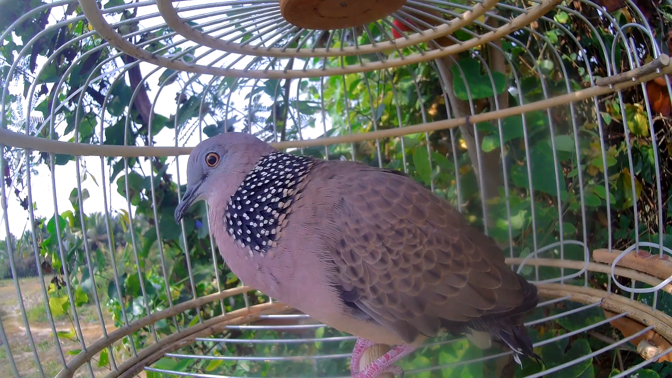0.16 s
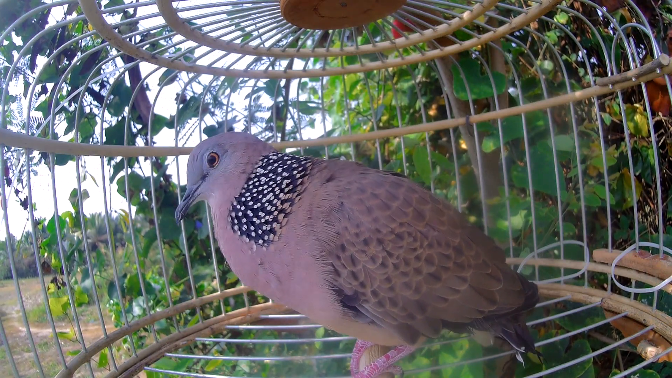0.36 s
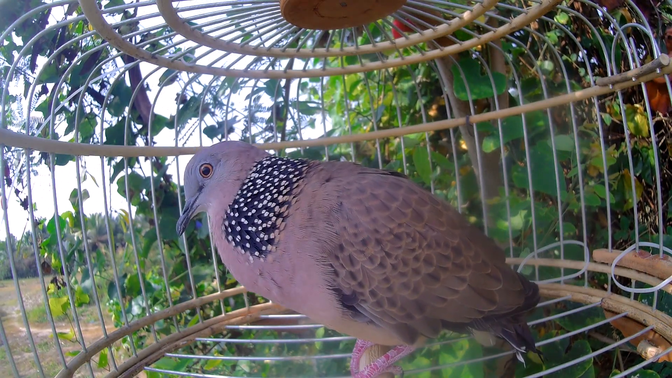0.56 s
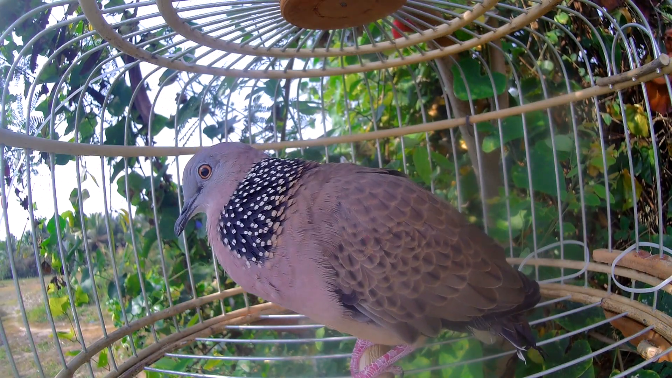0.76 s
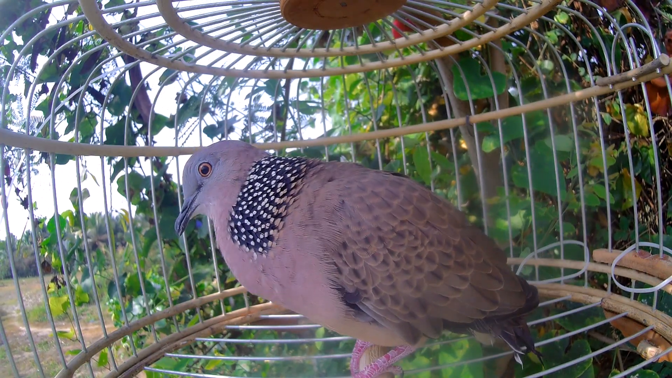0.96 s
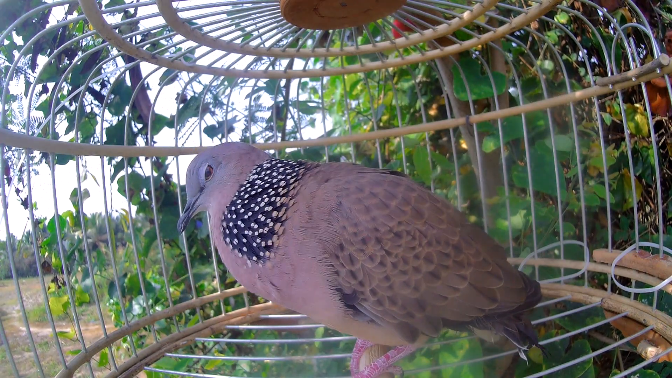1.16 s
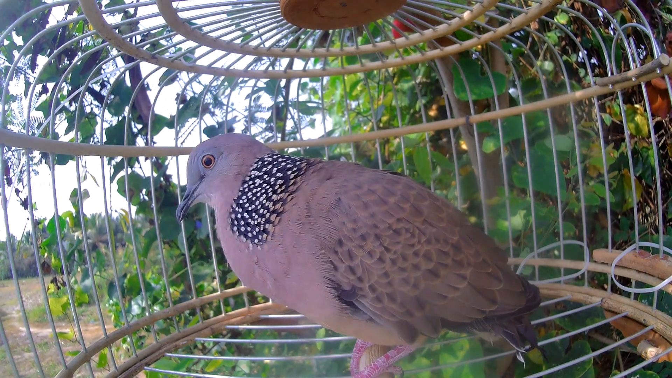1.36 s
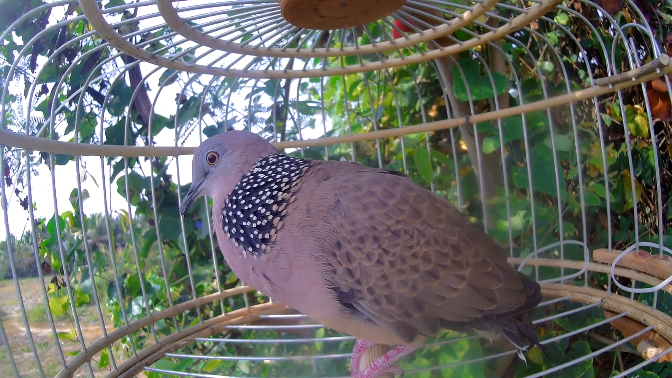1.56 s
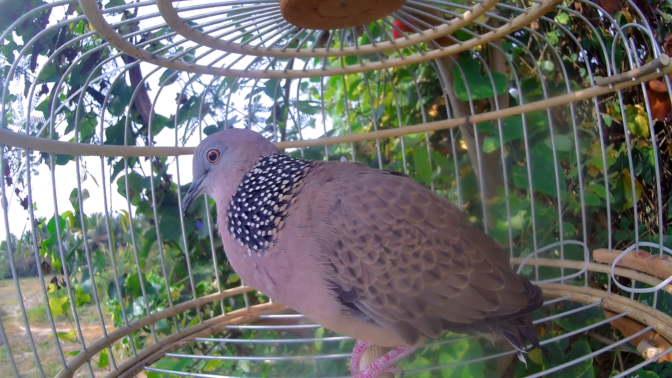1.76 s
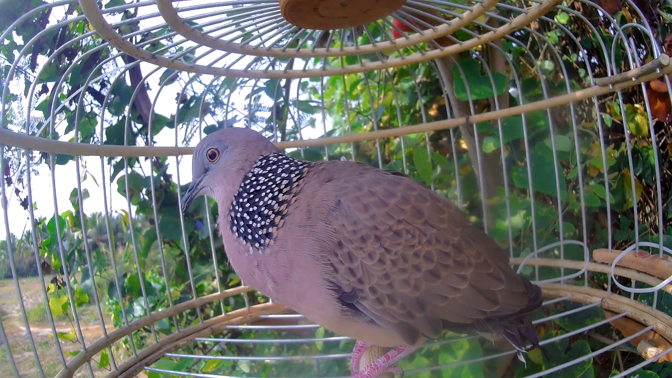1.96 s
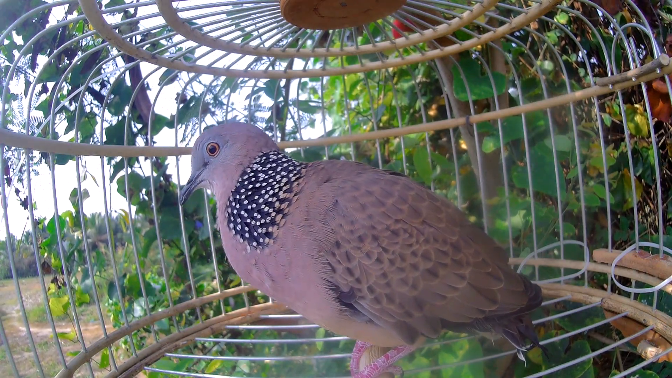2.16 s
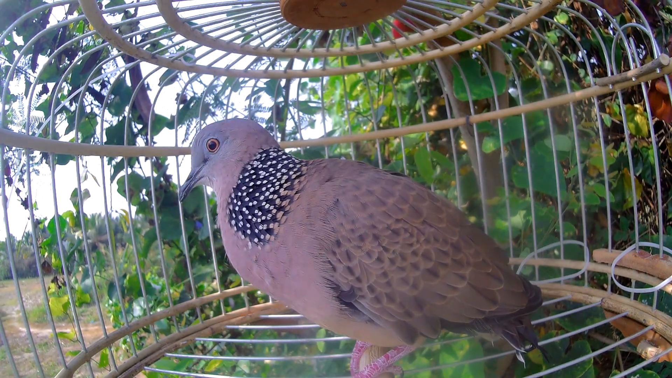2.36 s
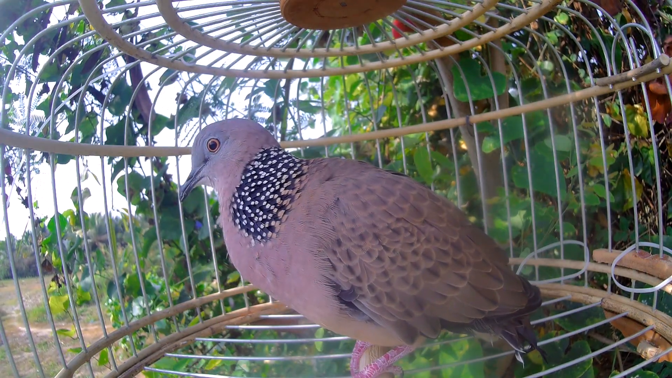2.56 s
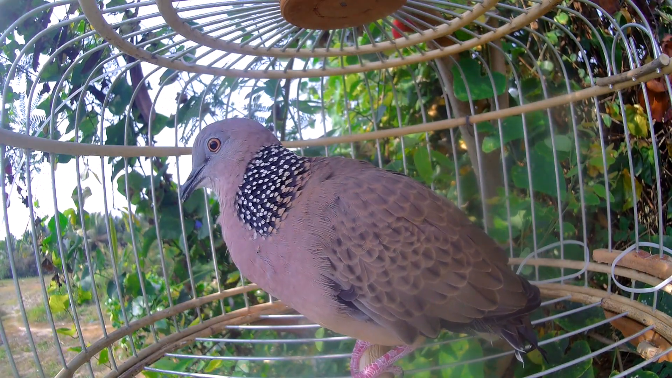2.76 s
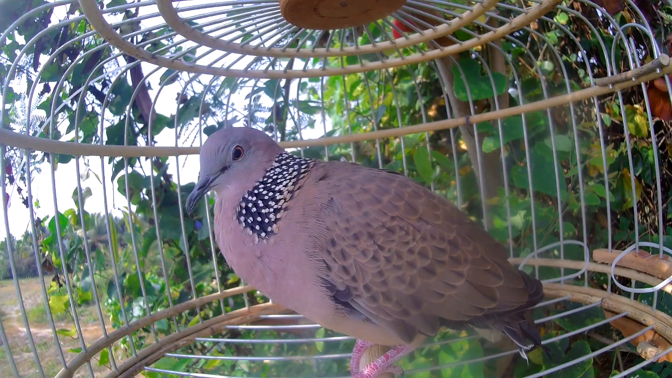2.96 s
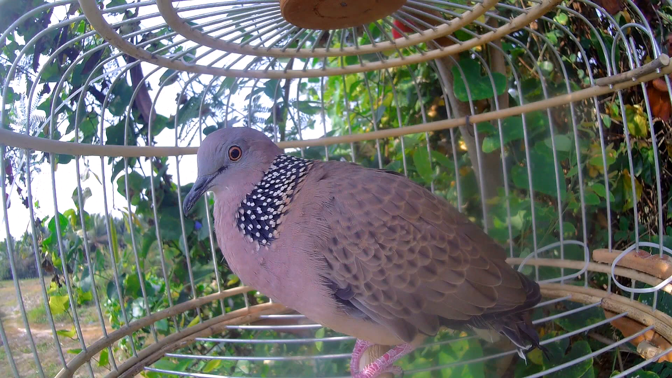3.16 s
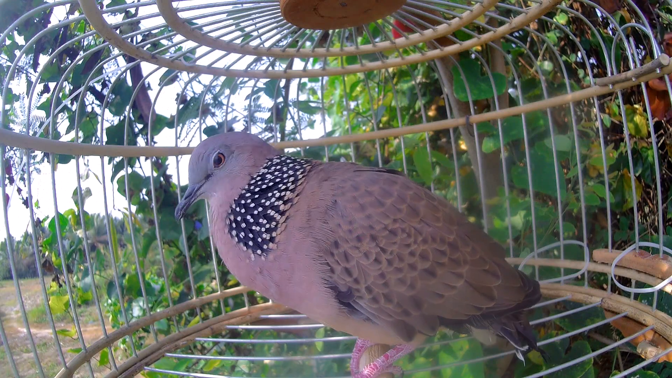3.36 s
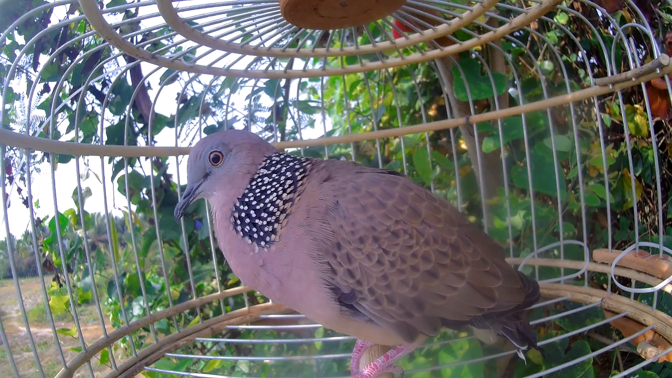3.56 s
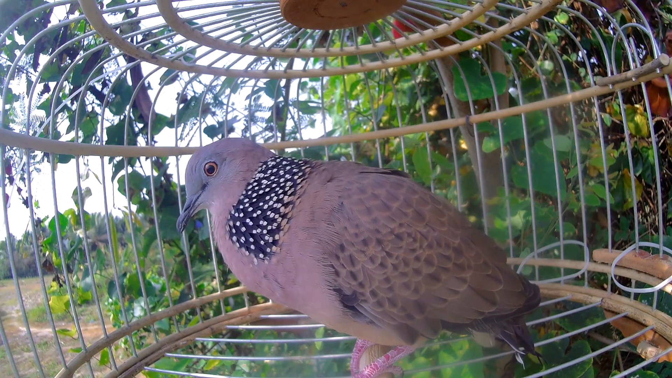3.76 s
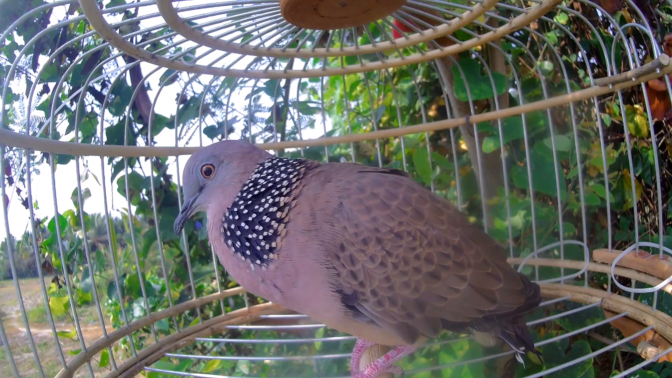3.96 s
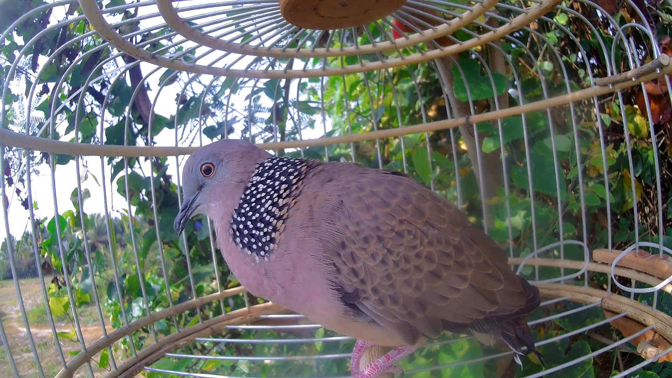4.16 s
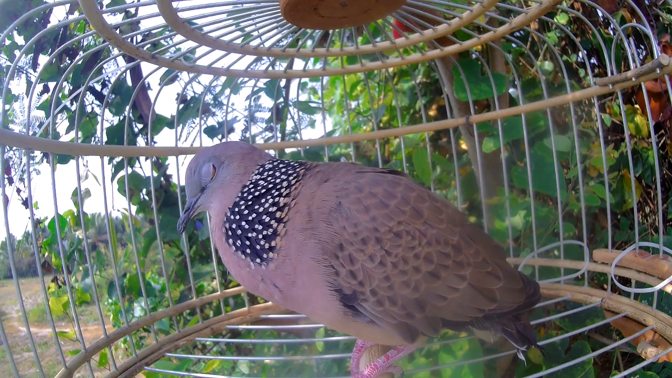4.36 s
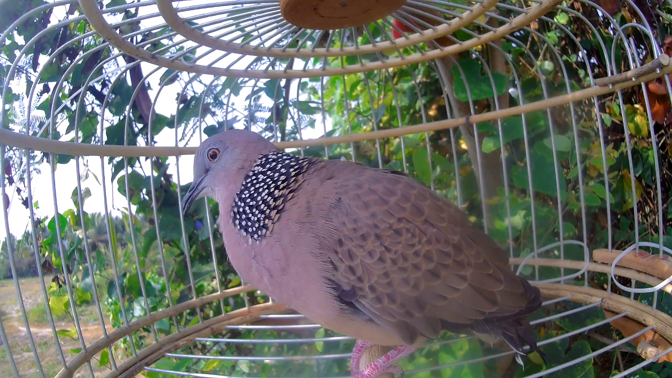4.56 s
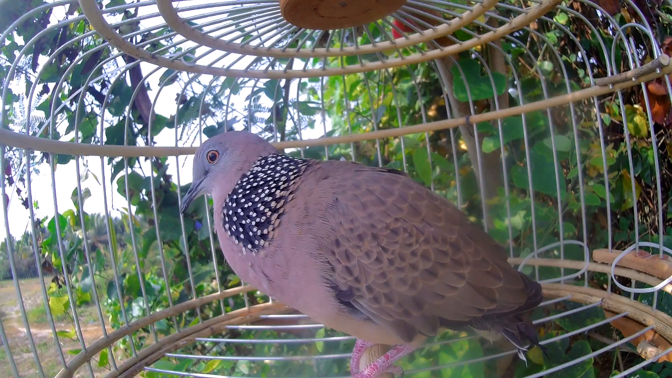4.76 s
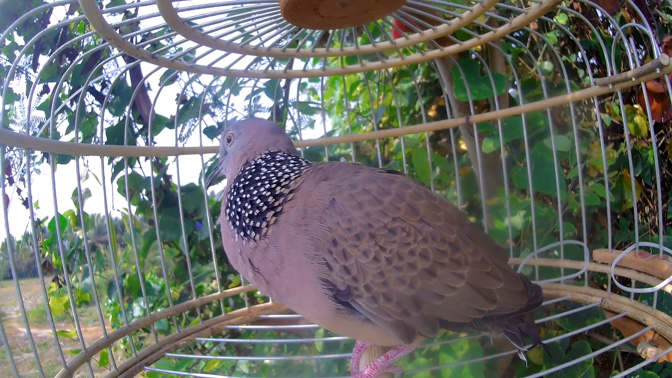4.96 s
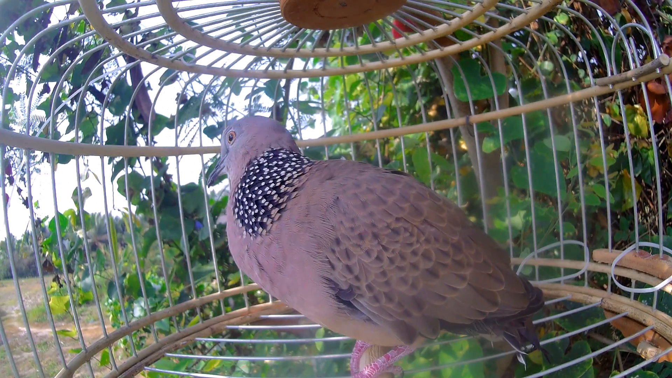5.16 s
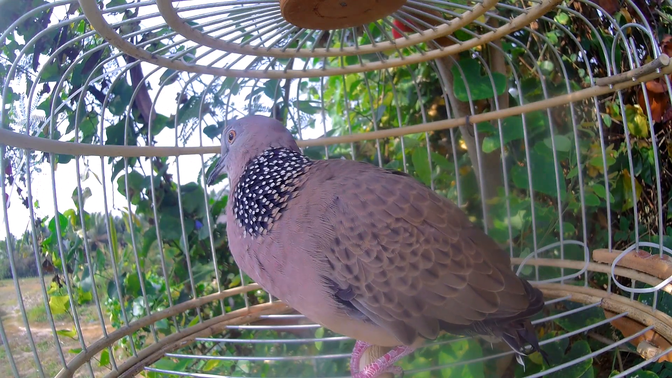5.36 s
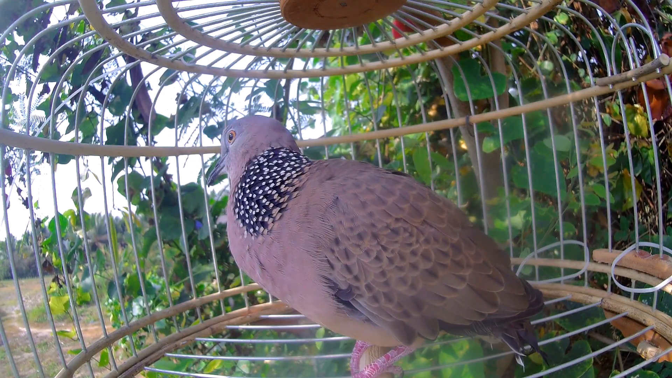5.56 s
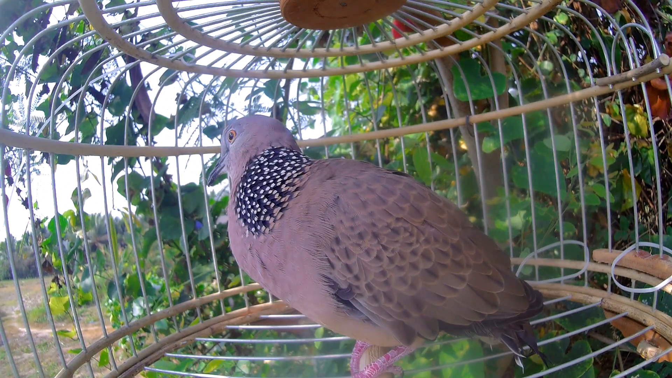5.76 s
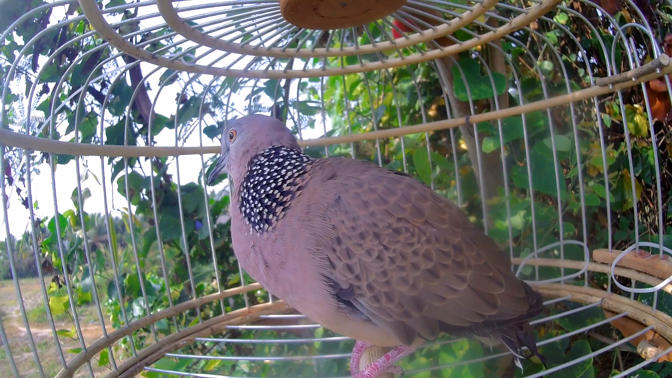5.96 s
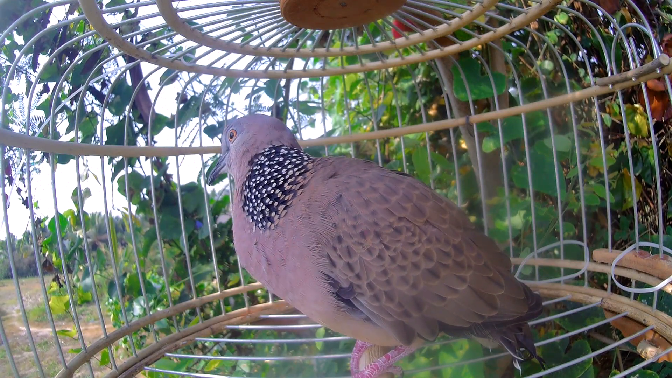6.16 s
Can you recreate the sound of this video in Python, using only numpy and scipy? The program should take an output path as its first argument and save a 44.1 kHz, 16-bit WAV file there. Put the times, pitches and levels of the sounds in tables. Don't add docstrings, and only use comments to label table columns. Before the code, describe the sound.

A close dove coos and breaks into a rolled, purring trill, twice, in a quiet garden with far doves and small birds faintly chirping.

```python
import sys
import numpy as np
from scipy import signal
from scipy.fft import rfft, irfft, next_fast_len
from scipy.io import wavfile
from scipy.ndimage import uniform_filter1d, map_coordinates

SR = 44100
rng = np.random.default_rng(int(sys.argv[2]) if len(sys.argv) > 2 else 0)


def ratio(d):
    e = np.asarray(d, float) / 20
    return 10 ** e


def bounce(signal):
    frames = np.transpose(np.atleast_2d(signal))
    limited = np.clip(frames, -1, 1)
    pcm = np.round(limited * 32767).astype(np.int16)
    wavfile.write(sys.argv[1], SR, pcm)


N = 273417
TIME = np.arange(N) / SR


def unit(x):
    return x / np.sqrt(np.mean(x ** 2) + 1e-20)


def along(points, hz):
    f, v = np.transpose(points)
    return np.interp(np.log(hz + 1), np.log(f + 1), v)


def wobble(rate_hz):
    return map_coordinates(rng.standard_normal(int(N * rate_hz / SR) + 4), [TIME * rate_hz])


def filtered(x, response):
    m = next_fast_len(N + SR // 2)
    return irfft(rfft(x, m) * response(np.fft.rfftfreq(m, 1 / SR)), m)[:N]


def coloured_noise(points):
    return unit(filtered(rng.standard_normal(N), lambda hz: ratio(along(points, hz))))


def ease(u):
    return np.sin(np.pi / 2 * np.clip(u, 0, 1)) ** 2


def played(rows, start, edge):
    s, *cols = np.transpose(rows)
    at = slice(max(round((start + s[0]) * SR), 0), round((start + s[-1]) * SR))
    t = TIME[at] - start
    gate = ease((t - s[0]) / edge) * ease((s[-1] - t) / edge)
    return at, gate, [np.interp(t, s, c) for c in cols]


def turns(hz):
    return 2 * np.pi * np.cumsum(hz) / SR


# (open [s], shut [s], top pitch [Hz])
PULSES = [(.2884, .3211, 793), (.3527, .3865, 819), (.4135, .4402, 803), (.4601, .4866, 793),
          (.5034, .5259, 771), (.5309, .5503, 763), (.5525, .5705, 753), (.5723, .5909, 747),
          (.5913, .6113, 732), (.6111, .63, 725), (.628, .648, 712), (.9795, 1.0015, 756),
          (3.4822, 3.5138, 791), (3.5467, 3.5828, 816), (3.6071, 3.6367, 806), (3.6581, 3.6813, 788),
          (3.6963, 3.7199, 774), (3.7251, 3.7419, 758), (3.7425, 3.763, 755), (3.7645, 3.7827, 745),
          (3.784, 3.8024, 734), (3.8027, 3.8214, 728), (3.8207, 3.84, 714), (4.1841, 4.2055, 747)]
PULSE_PARTIALS = [-29.5, -45.5, -56.5]
RISE_S, TAUT_HZ = .0065, 790
STRAIN_HZ, STRAIN_S_PER_HZ, SLACK_S_PER_HZ = 800, .0001, .00002
PEAK_DB, DB_PER_HZ = -3.4, .007
CATCH_HZ, CATCH_FOLLOWS = 683, .2
CATCH_DIP, CATCH_S = .14, .004
SAG_HZ_PER_S, SHUT_DROP, SHUT_S, LINGER_S = 1900, .06, .007, .0008
QUICK_S = .0215


def throat_pulses(pitch, partials, quick):
    for opens, shuts, top_hz in PULSES:
        slack_hz = min(top_hz - TAUT_HZ, 0)
        peak_db = PEAK_DB + DB_PER_HZ * slack_hz
        first_hz = .95 * (CATCH_HZ + CATCH_FOLLOWS * slack_hz)
        rise_s = RISE_S + STRAIN_S_PER_HZ * max(top_hz - STRAIN_HZ, 0) - SLACK_S_PER_HZ * slack_hz
        at = slice(round(opens * SR), round((shuts + LINGER_S) * SR))
        t, left = TIME[at] - opens, shuts + LINGER_S - TIME[at]
        hz = first_hz + (top_hz - first_hz) * ease(t / (1.75 * rise_s))
        hz -= SAG_HZ_PER_S * np.maximum(t - 2 * rise_s, 0)
        hz *= 1 - SHUT_DROP * ease(1 - left / SHUT_S)
        pitch[at] = hz * (1 - CATCH_DIP * ease(1 - t / CATCH_S))
        quick[at] = shuts - opens < QUICK_S
        sag_db = -2.4 * min((shuts - opens) / .026, 1) ** 2 * ease((t - rise_s) / .007)
        reedy_db = 19 * min((shuts - opens) / .022, 1) * ease(1 - t / (.9 * rise_s)) * [[0], [1], [.4], [.4]]
        levels_db = peak_db + sag_db + reedy_db + np.r_[0, PULSE_PARTIALS][:, None]
        partials[:, at] += ratio(levels_db) * ease(t / (1.08 * rise_s)) * ease(left / SHUT_S)


# (open [s], shut [s], swell [ms], peak [dB], top pitch [Hz])
LEADS = [
    (.9505, .9765, 19, -7, 668),
    (1.365, 1.3835, 14, -12, 621),
    (2.8335, 2.869, 22, -6.5, 710),
    (2.906, 2.9239, 5, -17.5, 572),
    (3.1575, 3.17, 6, -15.5, 610),
    (4.155, 4.18, 21, -8.5, 657),
    (4.585, 4.5995, 10, -13.5, 604),
]
SLACK_HZ = 577.8
LEAD_DIP, LEAD_DIP_S = .09, .006


def lead_ins(pitch, partials):
    for opens, shuts, swell_ms, peak_db, top_hz in LEADS:
        at = slice(round(opens * SR), round(shuts * SR))
        t, left = TIME[at] - opens, shuts - TIME[at]
        swell = np.sin(np.pi / 2 * np.clip(t / swell_ms * 1000, 0, 1))
        pitch[at] = (SLACK_HZ + (top_hz - SLACK_HZ) * swell) * (1 - LEAD_DIP * ease(1 - t / LEAD_DIP_S))
        levels_db = peak_db + (1 - swell) * [[-13], [14], [-4], [-5]] + [[0], [-31], [-40], [-50]]
        partials[:, at] += ratio(levels_db) * ease(t / .0042) * ease(left / .0055)


COO = ([(0, 595, -18), (.009, 700, -8.5), (.014, 732, -7.4), (.03, 762, -8.3)], [(.06, 770, -9.2),
        (.036, 752, -8.9), (.014, 700, -9.3), (.007, 635, -11.8), (0, 520, -26)])
ROLL_END = ([(0, 650, -15), (.011, 700, -7.4), (.019, 693, -8.8), (.028, 680, -8.5), (.041, 660, -9.8)],
             [(.068, 620, -13.5), (.046, 582, -17.2), (.02, 548, -21.3), (0, 480, -31)])
FALLING = ([(0, 625, -19), (.0095, 772, -7.2), (.018, 750, -8.5), (.05, 730, -8.9)], [(.07, 711, -8.8),
            (.043, 680, -8.6), (.023, 608, -12), (.014, 565, -16), (0, 490, -30)])
LAST = ([(0, 625, -22), (.009, 735, -6.9), (.017, 724, -8.3), (.04, 743, -9.1)], [(.045, 707, -7.9),
         (.019, 645, -9.3), (.011, 540, -20.5), (0, 500, -26)])
# (pitch [Hz], 2nd [dB rms], 3rd [dB rms], 4th partial [dB rms])
COO_TONE = [(540, -35.5, -64.5, -86), (617, -40.5, -59.5, -63.5), (720, -45, -53, -64),
            (765, -37, -56.5, -65)]
ROLL_TONE = [(496, -35, -54, -71.5), (597, -39, -47.5, -60.5), (661, -40, -72, -52),
             (720, -46, -43.5, -63.5)]
FALLING_TONE = [(484, -39.5, -61.5, -70.5), (533, -35.5, -45.5, -61.5), (673, -43.5, -43.5, -54.5),
                (715, -48.5, -45.5, -60.5)]
LAST_TONE = [(555, -39, -60, -74), (660, -65, -52, -66.5), (714, -62, -67, -58), (770, -56, -63, -59.5)]
# (shape, overtones, [(start [s], end [s], pitch factor [1], overtone strength [dB])])
NOTES = [
    (COO, COO_TONE, [(-.002, .1205, 1.006, 1.5), (3.166, 3.316, .996, -1.5)]),
    (ROLL_END, ROLL_TONE, [(.646, .77, 1.004, 0), (3.837, 3.973, .997, -1.5)]),
    (FALLING, FALLING_TONE, [(.9995, 1.151, .998, 1), (4.2035, 4.359, 1.002, -1)]),
    (LAST, LAST_TONE, [(1.386, 1.529, .999, 0), (4.6035, 4.746, 1.001, 0)]),
]


def held_notes(pitch, partials):
    for (opening, close), tone, sung in NOTES:
        tone_hz, *tone_db = np.transpose(tone)
        for start, end, factor, reedy_db in sung:
            rows = opening + [(end - start - s, hz, db) for s, hz, db in close]
            at, gate, (hz, db) = played(rows, start, edge=.0035)
            pitch[at] = factor * uniform_filter1d(hz, 200)
            levels_db = [db] + [np.interp(hz, tone_hz, partial_db) + reedy_db for partial_db in tone_db]
            partials[:, at] += np.sqrt(2) * ratio(uniform_filter1d(levels_db, 100, axis=1)) * gate


# (centre [Hz], width [Hz], level under the first partial [dB])
WINDPIPE = (5530, 260, -41.5)
UPPER_DB = [-12, -8, 0, -4.5, 0, -10]
BRIGHT_HZ, BRIGHT_DB_PER_HZ = 765, .06
QUICK_DB = 7


def windpipe(pitch, first_partial, quick, phase):
    centre_hz, width_hz, lift_db = WINDPIPE
    slope_hz_per_s = uniform_filter1d(np.gradient(pitch), 90) * SR
    steady = first_partial ** .75 / (1 + (slope_hz_per_s / 11000) ** 2)
    out = np.zeros(N)
    for k in range(5, 11):
        off_hz = k * pitch - centre_hz
        near = 1 / np.sqrt(1 + (off_hz / width_hz * 2) ** 2) / (1 + (off_hz / 700) ** 6)
        level_db = lift_db + UPPER_DB[k - 5] + QUICK_DB * quick * (k == 8)
        level_db = level_db + BRIGHT_DB_PER_HZ * (pitch - BRIGHT_HZ) + 3 * wobble(40)
        out += ratio(level_db) * near * steady * np.sin(k * phase)
    return out


# (time [s], peak [dB])
SWALLOWS = [(.123, -35), (.13, -36.5), (.253, -36.5), (.349, -30), (.769, -33), (.94, -35.5), (1.151, -28),
            (1.1567, -31), (1.3527, -33.5), (1.3615, -25), (1.529, -32), (1.5345, -30), (1.54, -37),
            (2.7907, -42), (3.316, -32), (3.4481, -32.5), (3.692, -27), (3.972, -30), (4.147, -33),
            (4.359, -28), (4.364, -33), (4.569, -37), (4.579, -30), (4.583, -23), (4.7455, -27),
            (4.75, -25)]


def swallows():
    out, t = np.zeros(N), TIME[:SR // 100]
    flap = ease(t / .0015) * ease((.006 - t) / .004) * np.sin(2 * np.pi * 620 * t)
    for s, db in SWALLOWS:
        out[round(s * SR):][:len(t)] += ratio(db) * flap
    return out


# (frequency [Hz], level [dB])
BREATH = [(250, -40), (400, -19.5), (1100, -3), (1500, -12), (3000, -25.5), (4500, -27.5), (5500, -17.5),
          (6500, -30.5), (8000, -62)]


def dove():
    pitch, partials, quick = np.full(N, 700.), np.zeros((4, N)), np.zeros(N)
    throat_pulses(pitch, partials, quick)
    lead_ins(pitch, partials)
    held_notes(pitch, partials)
    phase = turns(uniform_filter1d(pitch, 60) * (1 + .002 * wobble(90))) + np.pi / 2
    partials *= ratio(.22 * wobble(70))
    voice = sum(partials[k] * np.sin((k + 1) * phase) for k in range(4))
    voice += windpipe(pitch, partials[0], quick, phase)
    voice += ratio(-49) * partials[0] * coloured_noise(BREATH)
    return voice + swallows()


# (start [s], length [s], top pitch [Hz], last pitch [Hz], level [dB rms])
FAR = [
    (1.625, .075, 670, 640, -53),
    (1.69, .1, 785, 735, -47.5),
    (1.905, .395, 745, 632, -47.5),
    (4.41, .45, 750, 632, -51.5),
    (5.62, .145, 742, 722, -55),
    (5.86, .4, 795, 655, -54),
]
FAR_SCOOP, FAR_SCOOP_S, FAR_SWELL_DB = .08, .015, 1.8
FAR_ROLLED_S = .2


def far_doves():
    out = np.zeros(N)
    chop = np.sin(turns(48 * (1 + .22 * wobble(20))))
    for start, length, top_hz, last_hz, db in FAR:
        rolled = length > FAR_ROLLED_S
        at, gate, (u,) = played([(0, 0), (length, 1)], start, edge=.02)
        hz = top_hz + (last_hz - top_hz) * ease((u - .4) / .45)
        hz = hz * (1 - FAR_SCOOP * np.exp(-u * length / FAR_SCOOP_S))
        roll = chop[at] * ease(4 - 5 * u) * rolled
        level_db = db + 3 * np.sin(np.pi * u ** 1.5) * rolled + FAR_SWELL_DB * wobble(14)[at]
        phase = turns(.99 * hz * (1 + .115 * roll + .02 * wobble(35)[at]))
        out[at] += ratio(level_db) * gate * (1 + .6 * roll) * np.sin(phase)
    return ratio(-2) * out + ratio(-6) * garden(out)


def burred(phase, burr):
    return burr[0] * np.sin(phase) + burr[1] * np.cos(phase)


# (after start [s], pitch [Hz], level [dB])
SCOLD_HIGH = [(0, 4350, -20), (.011, 4750, -12), (.018, 5450, -7), (.026, 4900, -8)]
# (after start [s], pitch [Hz], level [dB])
SCOLD_LOW = [(.004, 2200, -26), (.02, 3200, -19), (.03, 4600, -1), (.046, 4400, -3), (.062, 3050, -7),
             (.081, 3650, -1), (.098, 3050, -2), (.118, 2400, -13), (.148, 2500, -24)]
# (time [s], level [dB], pitch factor [1])
SCOLDS = [
    (3.311, -41, 1.007),
    (4.227, -38.5, 1.02),
    (5.174, -35, 1.01),
    (5.808, -38, 1),
]
SCOLD_BURR = .75


def scolds(burr):
    out = np.zeros(N)
    light = SCOLD_BURR * burr + [[.7], [0]]
    for start, call_db, stretch in SCOLDS:
        for voice in SCOLD_HIGH, SCOLD_LOW:
            at, gate, (hz, db) = played(voice, start, edge=.011)
            phase = turns(uniform_filter1d(hz, 100) * stretch)
            octave = ratio(-25) * burred(2 * phase, burr[::-1, at])
            out[at] += ratio(call_db + db) * gate * (burred(phase, light[:, at]) + octave)
    return out


# (start [s], length [s], level [dB])
PEEPS = [
    (2.557, .045, -72),
    (2.683, .045, -74),
    (2.791, .03, -75),
    (3.024, .05, -73),
    (4.496, .06, -66),
    (4.733, .068, -63),
    (4.955, .05, -63),
    (5.416, .07, -62),
    (6.087, .068, -61),
]
# (first pitch [Hz], last pitch [Hz])
PEEP_HZ = (3200, 4680)
# (start [s], length [s], first pitch [Hz], last pitch [Hz], level [dB])
CHIPS = [(1.96, .018, 5130, 5200, -65), (1.979, 0.035, 5000, 5300, -61), (1.98, 0.071, 2360, 3170, -65),
         (2.039, 0.031, 4810, 4920, -54), (2.647, 0.022, 2480, 2510, -65.5),
         (3.931, .06, 4760, 4850, -60.5), (4.564, 0.048, 2700, 2924, -56.5), (4.61, 0.027, 4570, 4780, -57),
         (5.308, 0.025, 1590, 1565, -54), (5.33, 0.023, 1960, 1990, -58.5), (5.639, 0.096, 2476, 5300, -62),
         (5.708, 0.059, 2560, 3020, -58), (5.752, 0.08, 4850, 4610, -54.5),
         (5.868, 0.0265, 5430, 4730, -43), (5.923, 0.024, 5450, 5200, -47.5), (5.85, 0.02, 5350, 5500, -46),
         (5.99, 0.049, 3500, 3740, -58), (5.985, 0.032, 2840, 2970, -58), (6.159, 0.044, 2090, 2516, -56.5),
         (6.162, 0.052, 2790, 3240, -53.5)]
PEEP_BURR, CHIP_BURR = .8, 1.2


def peeps_and_chips(burr):
    out = np.zeros(N)
    calls = [(s, length, *PEEP_HZ, db, PEEP_BURR) for s, length, db in PEEPS]
    calls += [(*chip, CHIP_BURR) for chip in CHIPS]
    for start, length, first_hz, last_hz, db, rough in calls:
        at, gate, (u,) = played([(0, 0), (length, 1)], start, edge=.0041)
        phase = turns(first_hz + (last_hz - first_hz) * (1 - (1 - u) ** 2.2))
        tone = np.sin(phase) + 1.3 * rough * burred(phase, burr[:, at])
        out[at] += ratio(db) * gate * tone / (1.3 + rough)
    return out


HEDGE_S, HEDGE_DB = .05, -5


def small_birds():
    burr = np.array([.5 + wobble(600), wobble(600)])
    burr += ratio(-14) * np.array([wobble(3500), wobble(3500)])
    out = scolds(burr) + peeps_and_chips(burr)
    t = TIME[:SR // 20]
    leaves = ratio(-60 * t / HEDGE_S) * rng.standard_normal(len(t))
    out = out + ratio(HEDGE_DB) * signal.fftconvolve(out, leaves / np.linalg.norm(leaves))[:N]
    return ratio(-1) * out + ratio(-10) * garden(out)


# (time [s], wing beat [Hz], level [dB])
FLY = [(0, 164, -69), (.8, 162, -67), (1.15, 176, -71), (1.5, 160, -71), (1.85, 147, -73), (2.08, 162, -66),
       (2.35, 164, -66), (2.65, 181, -67), (2.92, 148, -69), (3.1, 162, -69), (3.5, 160, -70),
       (4.05, 172, -68), (4.35, 152, -72), (4.62, 163, -68), (4.77, 140, -68), (4.96, 165, -64),
       (5.17, 141, -67), (6.2, 138, -92)]
# (frequency [Hz], level [dB])
FLY_TONE = [(300, -20), (800, -7), (980, .5), (1150, -2), (1300, 1.5), (1480, 3.5), (1680, -8), (3000, -30)]
# (time [s], pitch [Hz], level [dB])
GNAT = [
    (4.95, 925, -72),
    (4.99, 918, -65),
    (5.055, 852, -61),
    (5.09, 850, -62),
    (5.14, 878, -63),
    (5.165, 880, -74),
]


def fly():
    at, _, (hz, db) = played(FLY, 0, edge=.01)
    phase = turns(uniform_filter1d(hz, 2500) * (1 + .00022 * wobble(33)))
    stack = sum(ratio(along(FLY_TONE, k * hz) + 3.5 * wobble(3)) * np.sin(k * phase + k * k)
                for k in range(2, 16))
    out = ratio(db - 1.5) * stack
    at, gate, (hz, db) = played(GNAT, 0, edge=.0093)
    out[at] += ratio(db + 3) * gate * np.sin(turns(uniform_filter1d(hz, 600)))
    return out


# (time [s], peak [dB])
TWIG = [
    (1.632, -39),
    (5.288, -48),
]
# (frequency [Hz], level [dB])
TWIG_TONE = [(2500, -30), (4200, 5), (6500, 4), (10000, -12)]


def twig():
    out, t = np.zeros(N), TIME[:SR // 50]
    for s, db in TWIG:
        out[round(s * SR):][:len(t)] += ratio(db - 60 * t / .008) * rng.standard_normal(len(t))
    return filtered(out, lambda hz: ratio(along(TWIG_TONE, hz)))


# (frequency [Hz], t60 [s])
GARDEN = [(300, .45), (1000, .33), (4000, .22), (9000, .15)]


def garden(x):
    hz, t, z = signal.stft(rng.standard_normal(SR // 2), SR, nperseg=256)
    tail = signal.istft(z * ratio(-60 * t / along(GARDEN, hz)[:, None]), SR, nperseg=256)[1]
    return signal.fftconvolve(np.pad(x, (350, 0)), tail / np.linalg.norm(tail))[:N]


# (frequency [Hz], level [dB per Hz])
AIR = [(18, -17), (30, -5.5), (50, -3.5), (85, -3), (250, -2.5), (437, -10), (670, -5.5), (1000, -9),
       (1500, -13.5), (2360, -15), (3900, -19), (5200, -16), (6500, -23), (8450, -55.5), (14300, -120)]
AIR_DB = -55.5


def air():
    return ratio(AIR_DB + .26 * wobble(1.9) + .4 * wobble(2.1)) * coloured_noise(AIR)


# (frequency [Hz], level [dB per Hz])
HISS = [(3530, -34.5), (6000, -12), (6340, -9), (6900, -6), (7500, 0), (8080, -4.5), (9180, -1.5),
        (9630, 0.5), (10700, -0.5), (11800, -11), (13300, -14), (14200, -5.5), (14700, -4.5), (15200, -5.5),
        (15500, -17)]
BUZZ_STRONG = [65, 67, 96, 128, 132]
BUZZ_HZ, STRONG_DB = 110.88, 7
HISS_DB, BUZZ_DB = -64, -67


def camera():
    multiple = np.arange(40, 140)
    bins = np.round(BUZZ_HZ * multiple * N / SR).astype(int)
    strength_db, turn = rng.standard_normal((2, len(multiple)))
    lines = np.zeros(N // 2 + 1, complex)
    lines[bins] = ratio(3 * strength_db + STRONG_DB * np.isin(multiple, BUZZ_STRONG)) * np.exp(.7j * turn)
    buzz = unit(filtered(irfft(lines, N), lambda hz: ratio(along(HISS, hz))))
    buzz_db = BUZZ_DB + 1.5 * wobble(3.3) - 2.1 * (TIME > 2.17)
    return ratio(HISS_DB) * coloured_noise(HISS) + ratio(buzz_db) * buzz


CAGE_S, CAGE_DB = .006, -25.5


def scene():
    coo = dove()
    cage = ratio(CAGE_DB) * np.pad(coo, (round(CAGE_S * SR), 0))[:N]
    close = coo + cage + ratio(-34) * garden(coo)
    return (close + far_doves() + small_birds() + fly() + twig() + air() + camera())[None]


def top_cut(x):
    return signal.sosfilt(signal.butter(12, 15660, fs=SR, output="sos"), x)


# (from [s], to [s])
STARVED = [
    (.285, .445),
    (.935, .955),
    (1.345, 1.41),
    (2.82, 2.845),
    (3.135, 3.17),
    (3.46, 3.59),
    (4.13, 4.19),
    (4.575, 4.635),
    (5.185, 5.22),
]
STARVED_HZ, OFFSET = 8600, -.0108


def record(dry):
    x = dry[0] + 0
    treble = filtered(dry[0], lambda hz: hz > STARVED_HZ)
    for s0, s1 in STARVED:
        x = x - treble * ease((TIME - s0) / .006) * ease((s1 - TIME) / .006)
    return top_cut(x[None] + OFFSET)


dry = scene()
out = record(dry)
bounce(out)
```